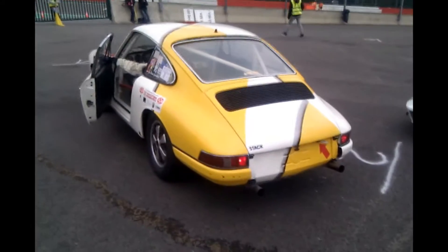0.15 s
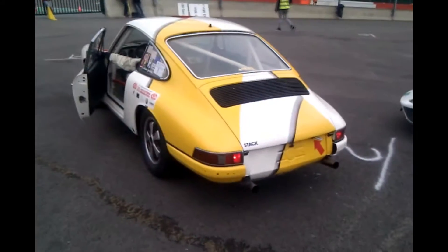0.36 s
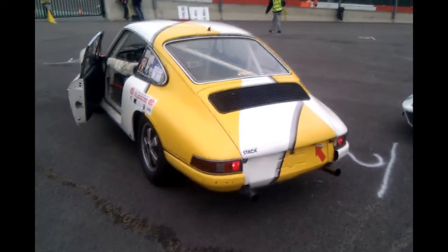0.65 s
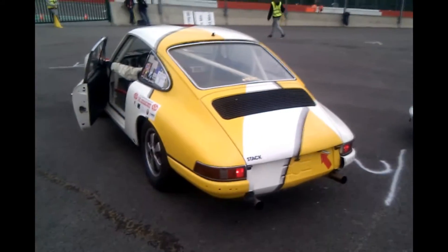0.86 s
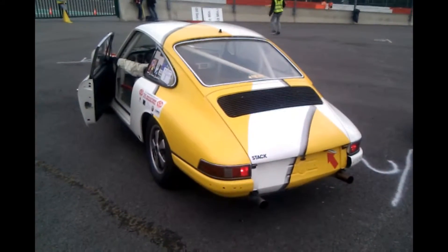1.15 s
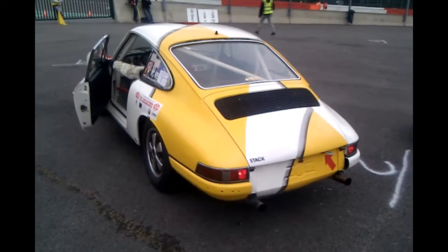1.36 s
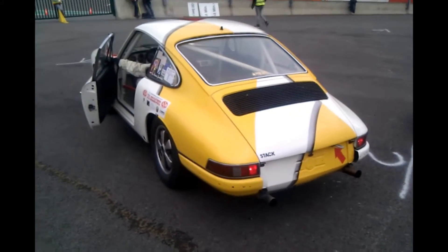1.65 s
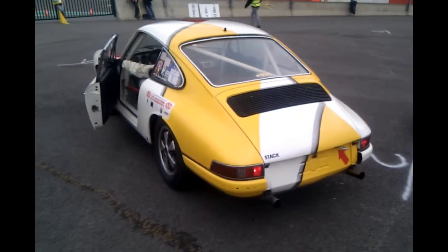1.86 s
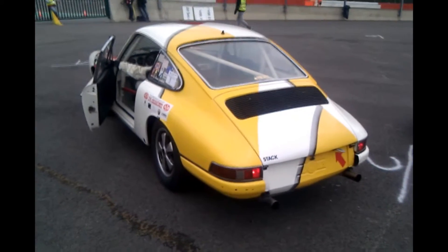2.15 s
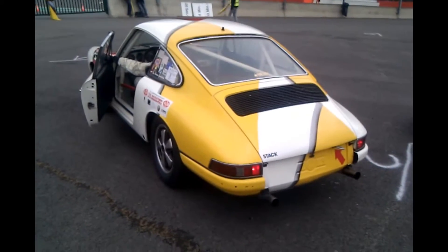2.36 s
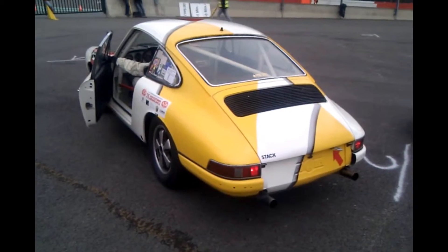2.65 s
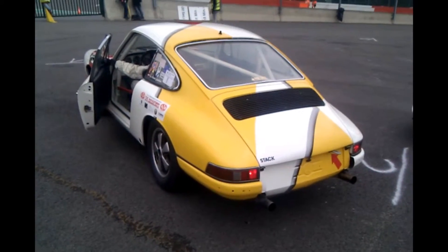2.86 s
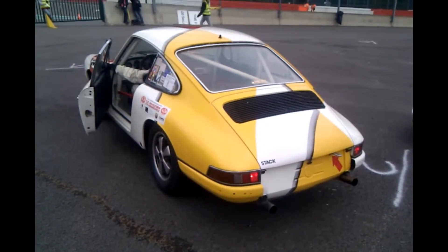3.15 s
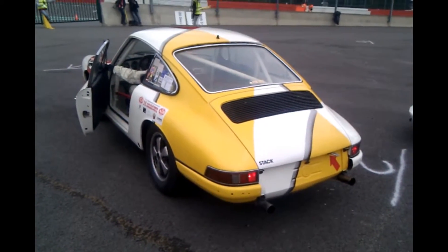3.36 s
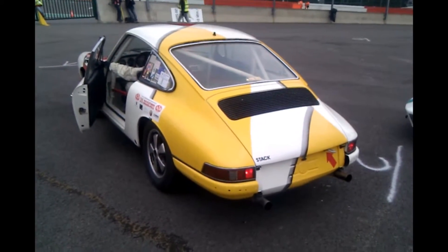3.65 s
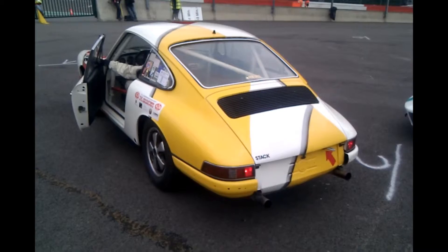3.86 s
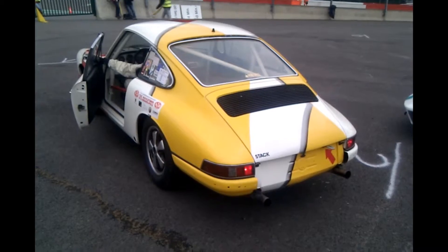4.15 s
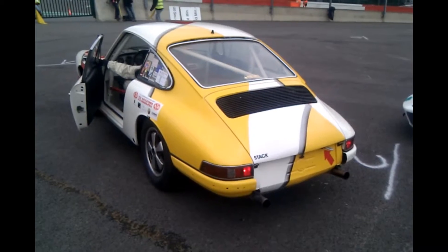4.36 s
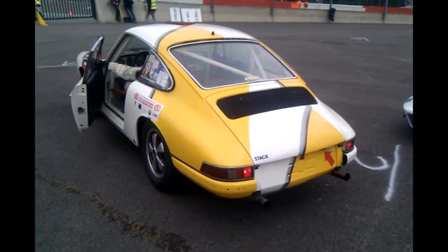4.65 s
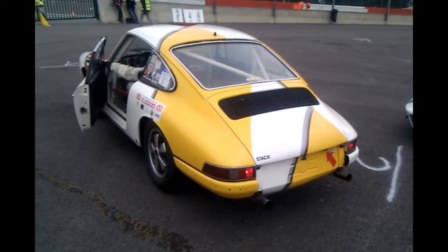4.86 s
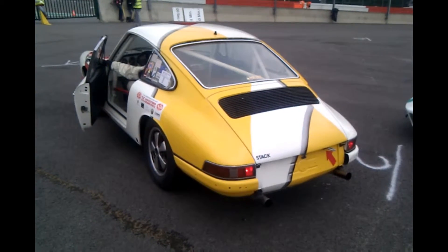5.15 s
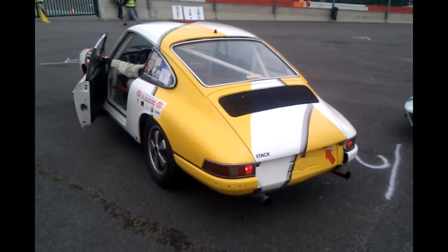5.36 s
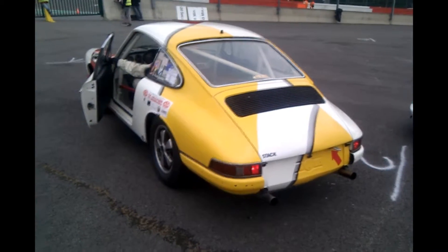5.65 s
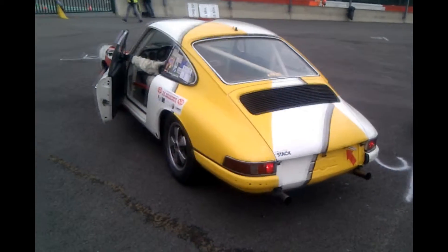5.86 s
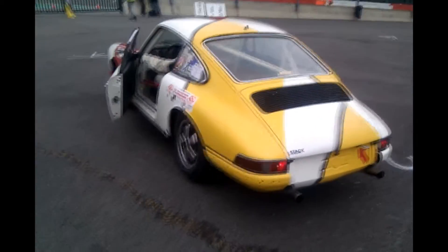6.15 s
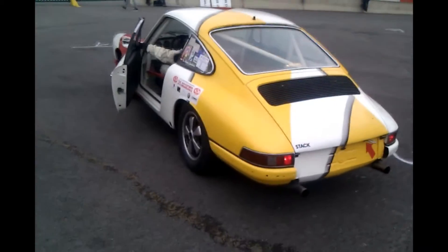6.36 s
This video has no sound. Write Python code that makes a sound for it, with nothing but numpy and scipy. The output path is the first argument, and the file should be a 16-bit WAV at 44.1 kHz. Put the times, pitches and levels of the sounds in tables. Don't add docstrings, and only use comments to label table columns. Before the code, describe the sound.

An old air-cooled sports car engine idles close by outdoors, deep throbbing exhaust with a lumpy, missing beat, sharp pops and metallic clatter.

```python
import sys
import numpy as np
from scipy import signal
from scipy.fft import rfft, irfft
from scipy.io import wavfile

SR = 44100
rng = np.random.default_rng(int(sys.argv[2]) if len(sys.argv) > 2 else 0)


def to_wav(sig):
    pcm = np.clip(np.atleast_2d(sig), -1, 1) * 32767
    pcm = np.round(pcm).astype(np.int16)
    wavfile.write(sys.argv[1], SR, pcm.T)


def amplitude_ratio(level_db):
    exponent = np.asarray(level_db, float) / 20
    return 10 ** exponent


N = 286650
LEAD = SR // 2
TIME = (np.arange(N + LEAD) - LEAD) / SR


def in_time(rows):
    s, *columns = np.transpose(rows)
    return [np.interp(TIME, s, c) for c in columns]


def rms_one(x):
    return x / np.sqrt(np.mean(x ** 2) + 1e-20)


def filtered(x, order, hz, kind):
    return signal.sosfiltfilt(signal.butter(order, hz, kind, fs=SR, output="sos"), x)


def ring(clicks, hz, t60):
    r, w = amplitude_ratio(-60 / (t60 * SR)), 2 * np.pi * hz / SR
    return signal.lfilter([0, np.sin(w)], [1, -2 * r * np.cos(w), r * r], clicks + 1e-18)


def resonances(x, peaks):
    out = 0
    for k, (hz, width, db) in enumerate(peaks):
        r = np.exp(-np.pi * width / SR)
        poles = [1, -2 * r * np.cos(2 * np.pi * hz / SR), r * r]
        band = signal.lfilter([(1 - r * r) / 2, 0, (r * r - 1) / 2], poles, x)
        out = out + (-1) ** k * amplitude_ratio(db) * band
    return out


# (time [s], speed [rpm])
CRANK_SPEED = [(0.0, 1600.5), (0.36, 1562.6), (0.44, 1578.6), (1.17, 1583.7), (1.28, 1566.7),
               (1.85, 1588.4), (2.3, 1551.4), (2.91, 1544.3), (3.01, 1518.1), (3.21, 1514.4),
               (3.57, 1564.0), (4.11, 1570.0), (4.68, 1525.3), (5.18, 1541.3), (5.47, 1528.9),
               (5.69, 1537.4), (6.02, 1517.7), (6.5, 1498.5)]
CYCLE_AT_START = -.2351


def crank():
    cycles = np.cumsum(in_time(CRANK_SPEED)[0]) / 120 / SR
    return cycles + CYCLE_AT_START - cycles[LEAD]


# (first miss [s], misses in a row [count], times over [count],
# first catch after [strength], second catch [strength])
STUMBLES = [(.144, 3, 1, .84, .31), (.333, 2, 1, .66, .27), (.6, 2, 1, .51, .17), (.714, 2, 1, .82, -.09),
            (.98, 2, 4, .9, .7), (1.779, 2, 3, .53, .75), (2.197, 2, 1, .74, .77), (2.352, 2, 1, .21, .52),
            (2.507, 2, 2, .98, .35), (2.933, 3, 1, 1.02, -.09), (3.091, 2, 1, .61, .9),
            (3.289, 2, 2, .74, .74), (3.599, 2, 1, .47, .2), (3.752, 2, 1, .7, -.09),
            (3.906, 2, 2, .65, .35), (4.25, 2, 1, .39, -.09), (4.521, 3, 1, .59, .3),
            (4.718, 2, 1, .69, -.09), (4.992, 2, 3, .6, .5), (5.421, 2, 1, .75, .82),
            (5.617, 1, 1, .6, .31), (5.852, 2, 2, .9, .6), (6.207, 1, 1, .37, .59), (6.366, 4, 1, .5, .5)]
LOPE_FIRINGS = 4
EVEN_CATCH, EVEN_SCATTER = .47, .12
MISS = -.06


def lean_catches(seconds, chance):
    caught = np.append(EVEN_CATCH + EVEN_SCATTER * chance, np.zeros(8))
    for start, misses, times, first, second in STUMBLES:
        nearest = np.abs(seconds - start).argmin()
        for k in nearest + LOPE_FIRINGS * np.arange(times):
            caught[k:k + misses + 2] = [MISS] * misses + [first, second]
    return caught[:len(seconds)] + 0.12 * chance


# (blow [dB], header delay [ms])
CYLINDERS = [
    (3.0, 2.84),
    (-10.5, 2.69),
    (2.2, 2.37),
    (1.5, 2.94),
    (-10.5, 2.75),
    (-0.0, 2.59),
]
LEAN = [1, 4]


def firings():
    cycles = crank()
    number = np.arange(np.ceil(6 * cycles[0]), 6 * cycles[-1] - 1).astype(int)
    seconds = np.interp(number / 6, cycles, TIME)
    cylinder = number % 6
    blow_db, delay_ms = np.transpose(CYLINDERS)[:, cylinder]
    chance = rng.standard_normal((len(number), 2))
    strength = amplitude_ratio(blow_db) * (1 + 0.04 * chance[:, 0])
    lean = np.isin(cylinder, LEAN)
    strength[lean] = lean_catches(seconds[lean], chance[lean, 1])
    at = ((seconds + delay_ms / 1000) * SR).astype(int) + LEAD
    return at, cylinder, strength


# (frequency [Hz], signed strength [ratio], t60 [s])
LEFT_PIPE = [(66.8, -0.414, 0.065), (95.0, 0.167, 0.125), (102.0, 0.525, 0.019), (268.3, -0.061, 0.121),
             (307.4, -0.006, 0.15), (354.4, 0.015, 0.098)]
# (frequency [Hz], signed strength [ratio], t60 [s])
RIGHT_PIPE = [(75.4, -0.358, 0.072), (92.7, 0.241, 0.15), (128.2, 0.04, 0.15), (189.9, -0.048, 0.112),
              (245.2, 0.091, 0.15), (349.6, -0.034, 0.09)]
IDLE_CYCLE = SR * 120 / 1552


def exhaust(at, cylinder, strength):
    cycles = crank()
    clock = (cycles - cycles[0]) * IDLE_CYCLE
    out = 0
    for bank, pipe in enumerate([LEFT_PIPE, RIGHT_PIPE]):
        mine = cylinder % 2 == bank
        blows = np.zeros(int(clock[-1]) + 2)
        blows[clock[at[mine]].astype(int)] = strength[mine]
        for hz, size, t60 in pipe:
            out = out + size * ring(blows, hz, t60)
    out = filtered(out, 6, 480, "low")
    return np.interp(clock, np.arange(len(out)), out)


# (low edge [Hz], high edge [Hz], lift [dB], change per sideways step [dB])
GROUND_LIFT = [(146, 235, 3, -6), (323, 790, -2, 6.5)]


def over_ground(pipes, step):
    for low_hz, high_hz, lift_db, change_db in GROUND_LIFT:
        band = filtered(pipes, 2, [low_hz, high_hz], "band")
        pipes = pipes + (amplitude_ratio(lift_db + change_db * step) - 1) * band
    return pipes


CRACK_DB = [-1, 4.5, -1.5, -1.5, 1.5, -2.5]
# (time [s], peak level [dB])
LOUD_CRACKS = [(0.2862, -28), (0.5038, -33), (0.5402, -33.5), (0.5906, -30), (0.6155, -30), (0.7687, -30),
               (1.3643, -27.5), (1.492, -32.5), (1.7315, -29.5), (1.7569, -32.5), (1.9834, -29),
               (2.0602, -25.5), (2.136, -27.5), (2.3825, -28.5), (2.4967, -29), (2.6519, -26),
               (2.7551, -37), (3.1477, -33), (3.3977, -27), (3.475, -30), (3.6292, -26.5), (3.8072, -29.5),
               (3.9624, -30), (4.1654, -32), (4.3565, -33), (4.5116, -36.5), (5.1123, -31.5),
               (5.4774, -29.5), (6.0267, -36.5), (6.1315, -29.5)]


def puffs(at, cylinder, strength, lag_ms, decay_ms, spread_db):
    sharpness_db = np.array(CRACK_DB)[cylinder] + spread_db * rng.standard_normal(len(at))
    size = np.maximum(strength, .12) * amplitude_ratio(sharpness_db)
    arrival = np.minimum(at + int(lag_ms * SR / 1000), len(TIME) - 1)
    when, peak_db = np.transpose(LOUD_CRACKS)
    size[np.searchsorted(TIME[arrival], when - .006)] = amplitude_ratio(peak_db + 36.0)
    kicks = np.zeros(len(TIME))
    kicks[arrival] = size
    rise, fall = np.exp(-1 / (0.00025 * SR)), np.exp(-1000 / (decay_ms * SR))
    return signal.lfilter([1 - rise], np.convolve([1, -rise], [1, -fall]), kicks + 1e-18)


def steep_front(jet):
    return rms_one(np.maximum(np.diff(jet, 2, prepend=[0, 0]), 0))


# (frequency [Hz], width [Hz], level [dB])
CRACK_RINGS = [(600, 260, -1), (1100, 360, -1), (1900, 680, -5.5), (2980, 470, 3.5), (4140, 170, 7),
               (5350, 620, 2.5), (5830, 2400, -11.5)]


def cracks(jet, front):
    hiss = rms_one(jet * rng.standard_normal(len(TIME)))
    return rms_one(resonances(hiss + front * steep_front(jet), CRACK_RINGS))


# (frequency [Hz], width [Hz], level [dB])
BAY_RINGS = [(432, 33, -7), (600, 32, -8.5), (670, 31, -7.5), (907.7, 18, -4.5), (719, 22, -11.5),
             (1017, 49, -10.5), (1081.6, 22, -2.5), (1127, 47, -6), (1254, 83, -13), (1920, 210, -13)]
VALVE_CONTACTS = 150
VALVE_SPREAD_DB = 1.5


def valve_train():
    cycles = crank()
    angle = (np.arange(VALVE_CONTACTS) + rng.random(VALVE_CONTACTS)) / VALVE_CONTACTS
    size = rng.choice([-1, 1], VALVE_CONTACTS)
    turns = (np.arange(np.ceil(cycles[0]), cycles[-1] - 1)[:, None] + angle).ravel()
    sizes = np.resize(size, len(turns)) * amplitude_ratio(VALVE_SPREAD_DB * rng.standard_normal(len(turns)))
    taps = np.zeros(len(TIME))
    np.add.at(taps, np.interp(turns, cycles, np.arange(len(TIME))).astype(int), sizes)
    return rms_one(resonances(taps, BAY_RINGS))


def shroud(at, cylinder):
    first = at[cylinder == 0]
    knocks = np.zeros(len(TIME))
    knocks[first] = amplitude_ratio(0.5 * rng.standard_normal(len(first)))
    return rms_one(ring(knocks, hz=901.5, t60=.24))


# (frequency [Hz], density [dB per Hz])
ROAR = [(20, -43.5), (50, -9), (110, -14.5), (250, -20), (400, -22), (530, -28), (680, -23), (1200, -25.5),
        (1550, -29.5), (2000, -33.5), (2700, -36), (4000, -44.5), (5500, -47.5), (7000, -73.5)]


def roar(jet, throb):
    hz = np.fft.rfftfreq(len(TIME), 1 / SR) + 1
    point_hz, point_db = np.transpose(ROAR)
    colour = amplitude_ratio(np.interp(np.log(hz), np.log(point_hz), point_db))
    broad = irfft(rfft(rng.standard_normal(len(TIME))) * colour, len(TIME))
    middle = signal.butter(2, [500, 3000], "band", fs=SR, output="sos")
    level = signal.sosfilt(middle, broad).std()
    struck = rng.standard_normal(len(TIME)) + 0.5 * steep_front(jet)
    tinware = rms_one(resonances(struck, BAY_RINGS))
    return (broad / level + amplitude_ratio(-4) * tinware) * (1 + throb * rms_one(jet))


# (time [s], nearness to the engine bay [dB], sideways step [0-1])
LISTENER = [
    (0, -0.5, 0.02),
    (2, 0, 0.15),
    (3, .5, .9),
    (4, 0.5, 0.07),
    (4.6, 0.5, 0.71),
    (5.5, 0, 0.7),
    (6.1, -.5, 0.97),
    (6.5, -.5, 1.0),
]
CRACKS_DB, ROAR_DB = -46.5, -33.5
PANEL_DB, VALVES_DB = -9, -2.5


def scene():
    near_db, step = in_time(LISTENER)
    at, cylinder, strength = firings()
    pipes = exhaust(at, cylinder, strength)
    pipes = signal.sosfilt(signal.butter(2, 40, "high", fs=SR, output="sos"), pipes)
    pipes = over_ground(pipes, step)
    jet = puffs(at, cylinder, strength, lag_ms=1.777, decay_ms=2.7, spread_db=2.5)
    machinery = roar(jet, throb=0.042)
    machinery = machinery + amplitude_ratio(PANEL_DB) * shroud(at, cylinder) + amplitude_ratio(VALVES_DB) * valve_train()
    bay = amplitude_ratio(CRACKS_DB) * cracks(jet, front=0.15) + amplitude_ratio(ROAR_DB) * machinery
    return (amplitude_ratio(0.18) * pipes + amplitude_ratio(near_db) * bay)[None, LEAD:]


# (start [s], length [s], openness above 4.8 kHz
TREBLE_SPELLS = [(0, .09, -1, -1), (.16, .16, 2, 1), (.32, .12, 1, 0), (.53, .2, 1.5, 1), (.85, .17, 2, 0),
                 (1.5, .18, -.4, -1.3), (1.7, .22, 2, .5), (2.05, .12, .6, 1), (2.17, .08, .8, -1.3),
                 (2.54, .05, -1.3, 0), (2.65, .1, 1, 1), (3.29, .16, 1.4, .2), (3.58, .11, -1, 0),
                 (3.94, .11, -1, -.9), (4.6, .1, -1, -.6), (4.7, .24, 1, 1), (5.06, .08, -1.3, 0),
                 (5.15, .22, 1.3, .8), (5.43, .16, -1, -.4), (5.6, .35, 1, .7), (5.95, .17, -1, -.7),
                 (6.16, .1, 0, 1), (6.26, .06, -1.2, 0), (6.32, .1, -2.2, -.5)]
# (low edge [Hz], high edge [Hz], openness needed [units])
BAND_THRESHOLDS = [
    (3300, 3500, -1.3),
    (3575, 3800, -.75),
    (4155, 4500, -1.1),
    (4455, 4830, .5),
    (4830, 5200, -1.7),
    (5200, 5640, -1.5),
    (5640, 6070, -.55),
    (6070, 6520, .6),
    (6520, 7030, 1.4),
    (7030, 22100, 9),
]
TREBLE_FLICKER, FRAME_S, SPLIT_HZ = .22, .064, 4800


def bands_kept(hz, s):
    top, middle = sum(np.outer(room, (s >= start) & (s < start + length))
                      for start, length, *room in TREBLE_SPELLS)
    frame = (s / FRAME_S).astype(int)
    kept = np.ones((len(hz), len(s)), bool)
    for low_hz, high_hz, cost in BAND_THRESHOLDS:
        flicker = TREBLE_FLICKER * rng.standard_normal(frame[-1] + 1)[frame]
        spare = top if low_hz > SPLIT_HZ else middle
        kept[np.ix_((hz > low_hz) & (hz <= high_hz), spare + flicker < cost)] = False
    return kept


def treble_dropouts(x):
    hz, s, frames = signal.stft(x, SR, nperseg=1024, noverlap=768)
    gain = np.where(bands_kept(hz, s), 1, amplitude_ratio(-50))
    return signal.istft(frames * gain, SR, nperseg=1024, noverlap=768)[1][:N]


def mirror_image(x, rate_hz):
    mirrored = rfft(2 * x * np.cos(2 * np.pi * rate_hz * np.arange(N) / SR))
    above = np.fft.rfftfreq(N, 1 / SR) - rate_hz / 2
    leak = amplitude_ratio(-0.5 - 0.0097 * above - .006 * np.maximum(above - 6000, 0))
    leak = leak * np.clip(above / 800, 0, 1) ** 2 * (above < rate_hz / 2)
    return irfft(mirrored * leak, N)


def roll_off(x):
    return signal.sosfilt(signal.butter(12, 15400, fs=SR, output="sos"), x)


def record(dry):
    x = treble_dropouts(dry[0])
    x = filtered(x, 4, 30, "high")
    x = x + mirror_image(x, rate_hz=16000)
    return roll_off(x[None])


dry = scene()
out = record(dry)
to_wav(out)
```